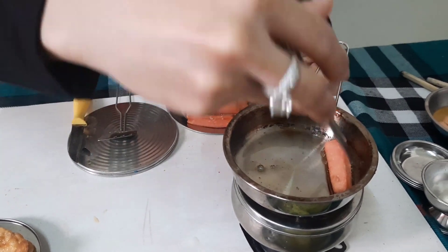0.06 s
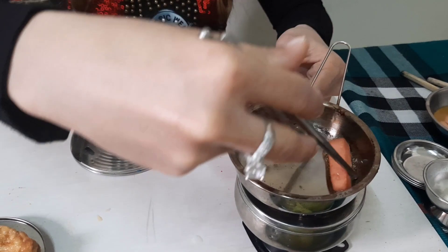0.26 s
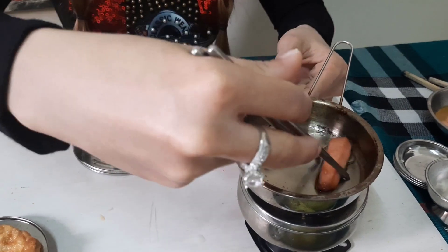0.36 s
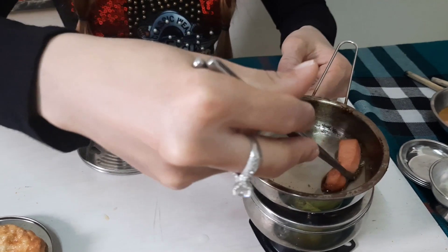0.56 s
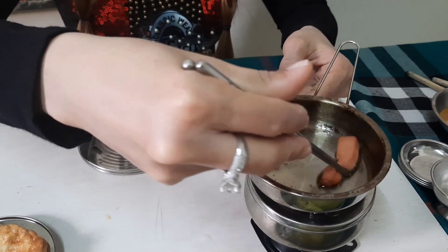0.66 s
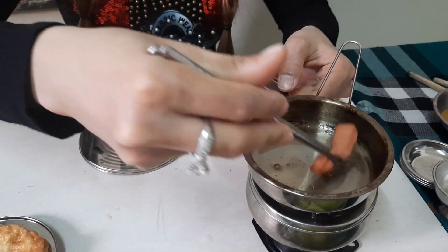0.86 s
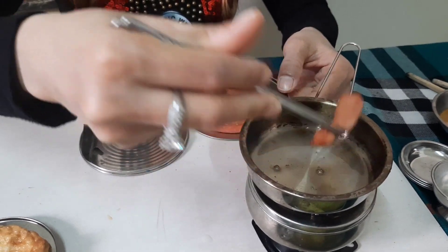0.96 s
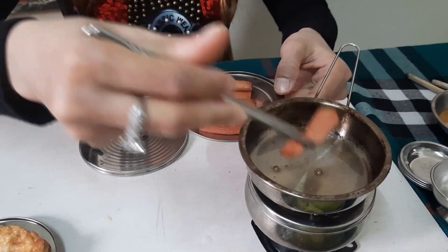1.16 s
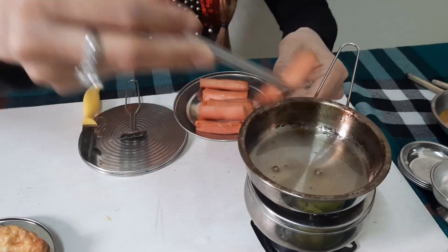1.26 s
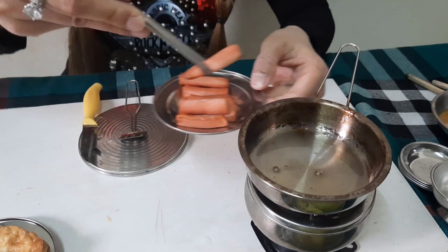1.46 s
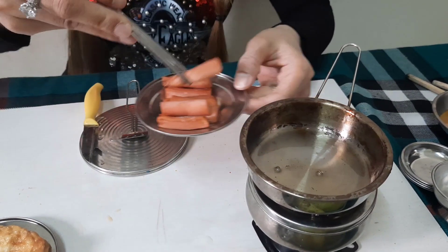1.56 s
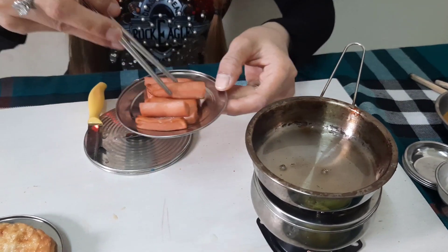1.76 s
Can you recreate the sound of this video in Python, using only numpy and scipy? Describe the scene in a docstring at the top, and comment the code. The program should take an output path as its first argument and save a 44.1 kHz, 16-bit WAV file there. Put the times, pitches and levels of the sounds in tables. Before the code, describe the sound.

Small steel tongs strike a little metal pan twice in quick succession, chatter and scrape briefly, then are choked; soft table thumps and low air puffs follow, close stereo microphone in a very quiet room.

```python
"""Steel tongs on a little pan

Small steel tongs clash twice against a little steel pan, then chatter and scrape along it as they grip a
piece of food; struck modes, crackling noise and a crowd of fine overtones make the metal.
Later come faint tinkles, soft swells of band noise, and clinks on a steel plate from resonant noise.
The table under the near microphone booms and rumbles as the hands move, from decaying low tones and
low noise. The passing sleeve puffs air at the left port: short swells of a low tone with rumble.
"""
import sys
import numpy as np
from scipy import signal
from scipy.fft import rfft, irfft, next_fast_len
from scipy.io import wavfile

SR = 44100
rng = np.random.default_rng(int(sys.argv[2]) if len(sys.argv) > 2 else 0)


def generate_wav(sig):
    """Save sig (samples, or channels by samples) to the path in sys.argv[1] as 16-bit PCM at SR."""
    pcm = np.round(np.clip(np.atleast_2d(sig).T, -1, 1) * 32767).astype(np.int16)
    wavfile.write(sys.argv[1], SR, pcm)


N = 79380  # length in samples

# faint air, spectrum points: hz, level_db
AIR_SPECTRUM = [(60, 22.5), (240, 21), (380, 1.5), (2400, -13), (3200, -24), (15000, -30)]
AIR_DB = -64

# low rumble of the table, spectrum points: hz, level_db
RUMBLE_SPECTRUM = [(20, -16.5), (62, 5), (85, -3.5), (128, 5.5), (170, 2), (220, -11), (257, -2.5),
                   (290, -15.5), (370, -39.5), (900, -70)]
# modes of the table: pitch_hz, level_db, t60_s
TABLE_MODES = [(59.8, 3, 0.24), (126.4, -24, 0.061), (176.4, -15.5, 0.094), (237, -26.5, 0.043)]
# nudges of the table: start_s, boom_db, rumble_db
NUDGES = [(0.048, -33, -51), (0.134, -35, -39.5), (0.239, -24, -37.5), (0.336, -35, -44.5),
          (0.411, -39.5, -55), (0.513, -34.5, -47.5), (.607, -43, -45.5), (.762, -30, -38.5),
          (0.827, -52, -49.5), (0.967, -39, -50), (1.012, -30, -47), (1.158, -35.5, -39.5),
          (1.764, -36, -52)]
NUDGE_RISE_S, NUDGE_BALANCE_DB = 0.012, 1.5  # every balance is left minus right
RUMBLE_HALF_S, RUMBLE_BALANCE_DB, RUMBLE_ALIKE = 0.023, 4.5, 0.65

# puffs of air from the sleeve: centre_s, level_db, pitch_hz, half_length_s
PUFFS = [(1.25, -21, 67.2, 0.013), (1.432, -28, 66.3, 0.024), (1.488, -24.5, 91, 0.014),
         (1.695, -34.5, 96.6, 0.019), (1.765, -34.5, 68.8, 0.055)]
PUFF_RIGHT_DB, PUFF_RUMBLE_DB = -24.5, -9.5  # right against left; rumble against the puff's tone

# soft swells of band noise, the first and loudest just before the first clash: # centre_s, half_length_s,
# level_db, pitch_hz, width_octaves
NOISE_SWELLS = [(0.302, 0.028, -51.5, 2077, 0.39), (0.61, 0.028, -69.5, 922, 0.13),
                (0.654, 0.034, -72, 2830, 0.049), (0.787, 0.11, -68.5, 909, 0.11),
                (0.787, 0.032, -69.5, 2190, 0.28), (1.295, 0.022, -68.5, 650.6, 0.114)]
NOISE_SWELL_BALANCE_DB = 19.5

# clinks of the tongs on the plate: start_s, level_db
CLINKS = [(1.31, -45.5), (1.477, -71), (1.707, -77)]
# resonances of the plate: pitch_hz, level_db
PLATE_MODES = [(1340, -19), (1840, 3), (2660, 3), (3994, -5.5), (4350, -20.5), (6050, -7.5), (7700, -16),
               (9750, -27), (15000, -29)]
PLATE_WIDTH_HZ, PLATE_BALANCE_DB = 110, 5.5
CLINK_RISE_S, CLINK_T60_S = 0.0054, 0.14
LEAD_DB, LEAD_RISE_S = -16.5, 0.024  # a faint slower swell before each clink

# free modes of the open tongs: pitch_hz, level_db
OPEN_TONGS_MODES = [(2099, -5), (6632, 3.5), (10535, 6.5), (15229, -8)]
TICK_S, TICK_DB, OPEN_T60_S = 0.196, -64, 0.39
# faint grazes of the closed tongs: start_s, level_db
TINKLES = [(0.651, -78.5), (0.794, -76.5)]
TINKLE_RISE_S, TINKLE_T60_S = 0.0053, 0.34

# clusters of overtones in the scrape: centre_hz, width_hz, level_db
SCRAPE_CLUSTERS = [(800, 108, 3.5), (1850, 160, 4), (2680, 320, 6), (3450, 360, 1.5), (4078, 250, 2),
                   (5135, 93, 1.5), (6070, 170, 2.5), (7490, 380, 6.5), (8700, 149, -6), (9700, 100, 0.5),
                   (10650, 210, -1.5), (12400, 300, -0.5), (14300, 430, -3), (15250, 330, -7)]
# stereo balance of the scrape: hz, left_minus_right_db
SCRAPE_BALANCE = [(750, 14.5), (2300, 6), (3500, 4.5), (15000, 1)]
SCRAPE_START_S, SCRAPE_PEAK_S, SCRAPE_END_S, SCRAPE_DB = 0.41, 0.458, 0.49, -26
SCRAPE_RISE_DB, SCRAPE_FALL_DB_PER_S = 10, 428.5
SLIPS_PER_S, SLIP_SCATTER, SLIP_T60_S = 1900, 0.15, 0.092  # scatter of the slips' log size

# contacts of tongs and pan: start_s, pan_low_db, pan_ring_db, tongs_ring_db, crack_db
CLASHES = [(0.3123, -20.5, -23, -28, -15), (0.3162, -35, -41.5, -32.5, -27.5),
           (0.3372, -33.5, -40.5, -23.5, -24), (0.3622, -20.5, -19, -29, -13.5),
           (0.3660, -48, -28.5, -37, -21), (0.3873, -48, -23, -41.5, -31.5), (0.4015, -53.5, -27, -35, -39),
           (0.4375, -48, -31, -31, -58.5)]
# low clonk of the pan's bottom: pitch_hz, level_db
PAN_LOW_MODES = [(677, -2), (723, 3.5), (763, -5), (867, -2.5)]
# ring of the pan's wall: pitch_hz, level_db
PAN_RING_MODES = [(2003, -3), (2229, 0.5), (2272, -1.5), (2309, -3), (2455, -9), (2761, -6.5),
                  (3949, -14.5), (4876, -12), (5163, -12.5), (6005, -13.5)]
# ring of the tongs: pitch_hz, level_db
TONGS_MODES = [(7063, 0.5), (7172, 4.5), (7298, -0.5), (7536, -1.5), (7682, -1), (7994, 0.5), (10724, -9),
               (11806, -11.5), (12791, -8), (14730, -7), (15450, -7)]
# colour of the crack and its shimmer, spectrum points: hz, level_db
CRACK_SPECTRUM = [(200, -13), (480, -16), (750, 13), (1200, -12.5), (2200, 1.5), (3300, -2), (5500, -5.5),
                  (7500, 7), (8800, -13), (12500, -2.5), (15000, -0.5)]
# stereo balance of the struck steel: hz, left_minus_right_db
STEEL_BALANCE = [(300, 8), (700, 3), (1300, 6), (2300, 15), (4000, 0.5), (7500, 3), (15000, 1.5)]
LOW_T60_S, PAN_T60_S, TONGS_T60_S = 0.078, 0.093, 0.12
CRACK_T60_S, SHIMMER_T60_S, SHIMMER_DB = 0.011, 0.22, -3
ATTACK_S, CONTACT_S = 0.00081, 0.00079  # rise time constant; time for the push to fall 10 dB
PHASE_SPREAD_RAD, PHASE_HZ = 1, 2000  # phase scatter between the ports, at this frequency
LOWEST_OVERTONE_HZ, HIGHEST_OVERTONE_HZ, OVERTONE_SPREAD_DB = 1400, 16000, 2
STEEL_LOW_CUT_HZ = 560

GRIP_S, GRIP_DB_PER_S = 0.581, 227  # the gripped food damps the clashes and scrape
TOP_HZ = 15750  # band limit


def amp(db):
    """Turn decibels into gain."""
    return 10 ** (np.asarray(db) / 20)


def unit(x):
    """Scale to rms 1."""
    return x / np.sqrt(np.mean(x ** 2) + 1e-20)


def along(points, hz):
    """Read a value between (hz, value) points on a log-frequency axis."""
    point_hz, value = np.transpose(points)
    return np.interp(np.log(hz + 1), np.log(point_hz + 1), value)


def since(s):
    """Count the seconds since s, zero before it."""
    return np.maximum(np.arange(N) / SR - s, 0)


def lead_in(s, rise_s):
    """Rise exponentially to 1 at s and stay there."""
    return np.exp(np.minimum(np.arange(N) / SR - s, 0) / rise_s)


def onset(s, attack_s=ATTACK_S):
    """Start from silence at s and settle towards 1."""
    return 1 - np.exp(-since(s) / attack_s)


def swell(s, half_s):
    """Rise and fall softly around s."""
    return 1 / np.cosh(np.clip((np.arange(N) / SR - s) / half_s, -20, 20))


def sides(balance_db):
    """Split a left-minus-right balance into left and right gains."""
    return amp(np.array([[0.5], [-0.5]]) * balance_db)


def filtered(x, response):
    """Shape the spectrum of x by a gain over frequency."""
    size = next_fast_len(N + SR // 4)
    spectrum = rfft(x, size) * response(np.fft.rfftfreq(size, 1 / SR))
    return irfft(spectrum, size)[..., :N]


def noise(response, alike):
    """Make coloured stereo noise of rms 1, partly shared by the two ports."""
    shared, opposed = rng.standard_normal((2, N))
    angle = np.arccos(np.clip(alike, -1, 1)) / 2
    stereo = np.cos(angle) * shared + np.sin(angle) * opposed * np.array([[1], [-1]])
    return unit(filtered(stereo, response))


def ring(modes, t60, s, attack_s=ATTACK_S):
    """Strike decaying modes at s, the strongest near gain 1, each with its own phase at the two ports."""
    t, out = np.arange(SR // 3) / SR, np.zeros((2, N))
    top_db = max(db for _, db in modes)
    for hz, db in modes:
        lag = rng.normal(0, PHASE_SPREAD_RAD) * np.sqrt(hz / PHASE_HZ) * np.array([[0.5], [-0.5]])
        level = amp(db - top_db + rng.normal(0, 1))  # 1 dB of scatter
        tone = sides(along(STEEL_BALANCE, hz)) * level * np.sin(2 * np.pi * hz * t + lag)
        out[:, round(s * SR):][:, :len(t)] += tone
    return out * amp(-60 * since(s) / t60) * onset(s, attack_s)


def overtones(count=300):
    """Fine, uneven steel overtones over low noise, undamped: a quarter second for each port."""
    t = np.arange(SR // 4) / SR
    hz = np.linspace(LOWEST_OVERTONE_HZ, HIGHEST_OVERTONE_HZ, count)
    hz = hz + (hz[1] - hz[0]) * rng.uniform(-0.79, 0.56, count)
    size = amp(OVERTONE_SPREAD_DB * rng.standard_normal((2, count, 1)))
    phase = rng.random((2, count, 1))
    crowd = unit((size * np.sin(2 * np.pi * (hz[:, None] * t + phase))).sum(axis=1))
    low_pass = signal.butter(4, LOWEST_OVERTONE_HZ, fs=SR, output="sos")
    return crowd + signal.sosfilt(low_pass, rng.standard_normal(crowd.shape))


def wake(force, crowd, t60, colour, balance):
    """A force rings the crowd of overtones, which dies away and is coloured by the steel."""
    answer = crowd * amp(-60 * np.arange(crowd.shape[1]) / SR / t60)
    sound = signal.fftconvolve(force[None], answer, axes=1)[:, :N]
    return filtered(sound, lambda hz: colour(hz) * sides(along(balance, hz)))


def room():
    """Very faint air: a bed of mostly low noise."""
    return amp(AIR_DB) * noise(lambda hz: amp(along(AIR_SPECTRUM, hz)), alike=0.13)


def rumble():
    """Low noise through the table's resonances."""
    return noise(lambda hz: amp(along(RUMBLE_SPECTRUM, hz)), RUMBLE_ALIKE)


def table():
    """Each soft nudge rocks the table's modes and brings a short rumble."""
    t, booms = np.arange(N) / SR, np.zeros(N)
    for s, boom_db, _ in NUDGES:
        for hz, mode_db, t60 in TABLE_MODES:
            envelope = amp(boom_db + mode_db - 60 * since(s) / t60) * lead_in(s, NUDGE_RISE_S)
            booms += envelope * np.sin(2 * np.pi * (hz * t + rng.random()))
    booms = filtered(booms, lambda hz: 1 / (1 + (hz / 330) ** 10))  # keep the lows
    effort = sum(amp(db) * swell(s, RUMBLE_HALF_S) for s, _, db in NUDGES)
    return sides(NUDGE_BALANCE_DB) * booms + sides(RUMBLE_BALANCE_DB) * effort * rumble()


def puffs():
    """The sleeve pushes air at the left port: short swells of a low tone with rumble in them."""
    t, flutter = np.arange(N) / SR, amp(PUFF_RUMBLE_DB) * rumble()
    air = sum(amp(db) * swell(s, half_s) * (np.cos(2 * np.pi * hz * (t - s)) + flutter)
              for s, db, hz, half_s in PUFFS)
    return air * np.array([[1], [amp(PUFF_RIGHT_DB)]])


def noise_swells():
    """Soft swells of band noise, mostly on the left, the loudest just before the first clash."""
    t, out = np.arange(N) / SR, np.zeros((2, N))
    for s, half_s, db, hz, width in NOISE_SWELLS:
        band = noise(lambda f: np.exp(-0.5 * (np.log2((f + 1) / hz) / width) ** 2), alike=0.13)
        out += amp(db) * np.exp(-((t - s) / half_s) ** 2) * band
    return sides(NOISE_SWELL_BALANCE_DB) * out


def plate():
    """Soft, rough clinks of tongs on a plate: noise through the steel's resonances, swelling and decaying."""
    def resonances(f):
        peaks = [amp(db) / (1 + ((f - hz) / PLATE_WIDTH_HZ) ** 2) for hz, db in PLATE_MODES]
        return np.sqrt(sum(peak ** 2 for peak in peaks))

    steel = noise(resonances, alike=0.21)
    level = np.zeros(N)
    for s, db in CLINKS:
        rise = lead_in(s, CLINK_RISE_S) + amp(LEAD_DB) * lead_in(s, LEAD_RISE_S)
        level += rise * amp(db - 60 * since(s) / CLINK_T60_S)
    return sides(PLATE_BALANCE_DB) * steel * level


def tinkles():
    """The open tongs tick and ring freely; closed on the food, they tinkle as they graze the pan."""
    tick = amp(TICK_DB) * ring(OPEN_TONGS_MODES, OPEN_T60_S, TICK_S)
    grazes = sum(amp(db) * ring(TONGS_MODES, TINKLE_T60_S, s, TINKLE_RISE_S) for s, db in TINKLES)
    return tick + grazes


def scrape(crowd):
    """The tips slide over the steel: many tiny slips, each waking clusters of overtones briefly."""
    def clusters(f):
        return sum(amp(db) * np.exp(-0.5 * ((f - hz) / width) ** 2) for hz, width, db in SCRAPE_CLUSTERS)

    t = np.arange(N) / SR
    slips = (rng.random(N) < SLIPS_PER_S / SR) * np.exp(SLIP_SCATTER * rng.standard_normal(N))
    grit = unit(wake(slips, crowd, SLIP_T60_S, clusters, SCRAPE_BALANCE))
    rise_db = SCRAPE_RISE_DB * np.minimum((t - SCRAPE_PEAK_S) / (SCRAPE_PEAK_S - SCRAPE_START_S), 0)
    fall_db = SCRAPE_FALL_DB_PER_S * since(SCRAPE_END_S)
    return grit * amp(SCRAPE_DB + rise_db - fall_db) * onset(SCRAPE_START_S)


def cracks(crowd):
    """Every contact gives a short crack of noise and leaves a shimmer of overtones."""
    def envelope(s, decay_db_per_s):
        return onset(s) * amp(-decay_db_per_s * since(s))

    def colour(hz):
        return amp(along(CRACK_SPECTRUM, hz))

    snap, force = np.zeros(N), np.zeros(N)
    for s, *_, db in CLASHES:
        snap += amp(db) * envelope(s, 60 / CRACK_T60_S)
        push = rng.standard_normal(N) * envelope(s, 10 / CONTACT_S)
        force += amp(db) * push / np.linalg.norm(push)  # equal energy before the level
    snap = snap * noise(lambda hz: colour(hz) * sides(along(STEEL_BALANCE, hz)), alike=0.16)
    return snap + amp(SHIMMER_DB) * wake(force, crowd, SHIMMER_T60_S, colour, STEEL_BALANCE)


def clashes():
    """Each contact rings pan and tongs in its own proportions; such small steel radiates no bass."""
    rings = np.zeros((2, N))
    for s, low_db, pan_db, tongs_db, _ in CLASHES:
        rings += amp(low_db) * ring(PAN_LOW_MODES, LOW_T60_S, s)
        rings += amp(pan_db) * ring(PAN_RING_MODES, PAN_T60_S, s)
        rings += amp(tongs_db) * ring(TONGS_MODES, TONGS_T60_S, s)
    high_pass = signal.butter(6, STEEL_LOW_CUT_HZ, "high", fs=SR, output="sos")
    return signal.sosfilt(high_pass, rings)


def scene():
    """Mix all layers at the two ports, the grip choking the clashes, cracks and scrape."""
    background = room() + table() + puffs()
    soft_layers = noise_swells() + plate() + tinkles()
    crowd = overtones()
    steel = scrape(crowd) + cracks(crowd) + clashes()
    return background + soft_layers + steel * amp(-GRIP_DB_PER_S * since(GRIP_S))


def record(dry):
    """The recorder rolls off very steeply above its band limit."""
    return filtered(dry, lambda hz: 1 / np.sqrt(1 + (hz / TOP_HZ) ** 160))


dry = scene()
out = record(dry)
generate_wav(out)
```